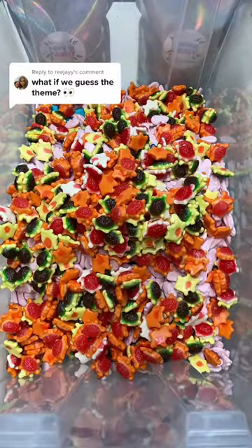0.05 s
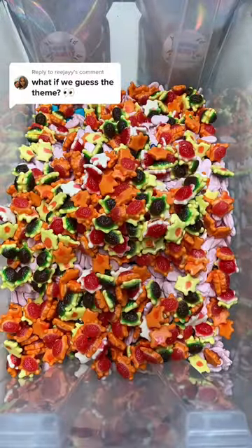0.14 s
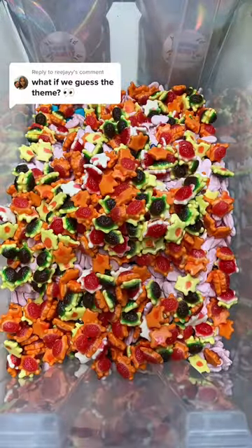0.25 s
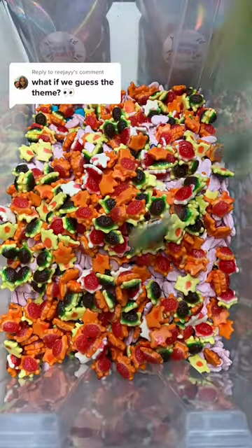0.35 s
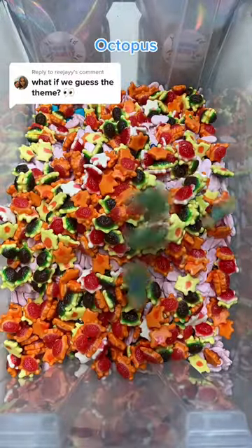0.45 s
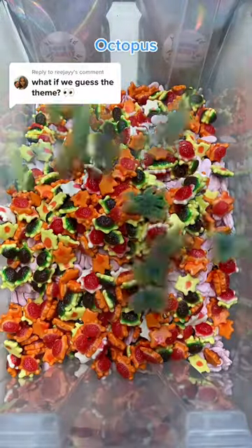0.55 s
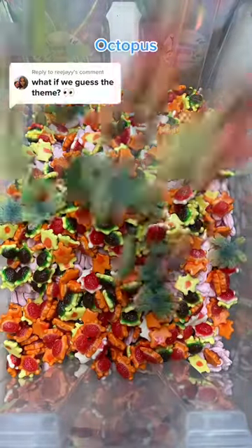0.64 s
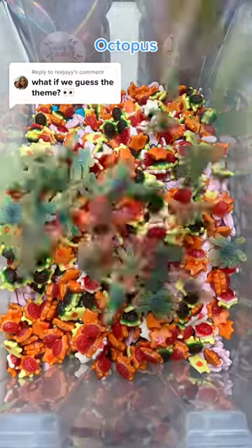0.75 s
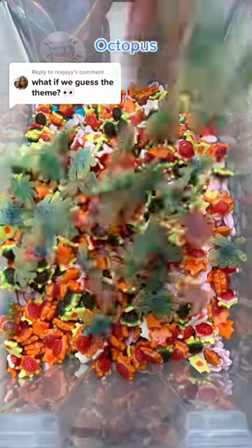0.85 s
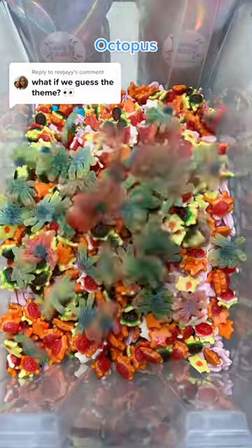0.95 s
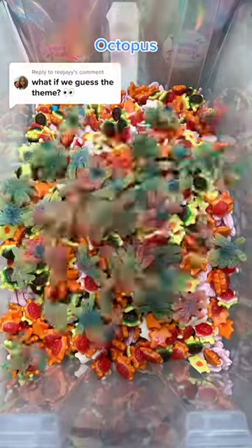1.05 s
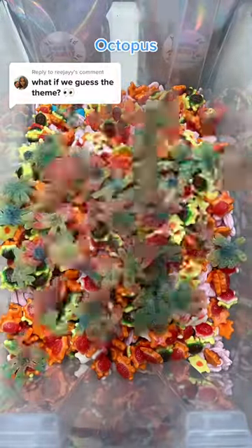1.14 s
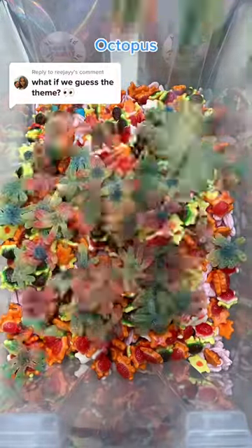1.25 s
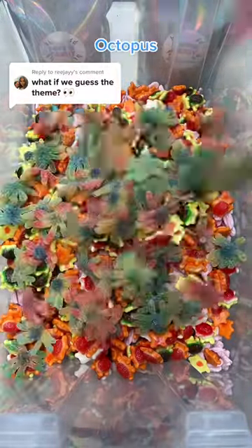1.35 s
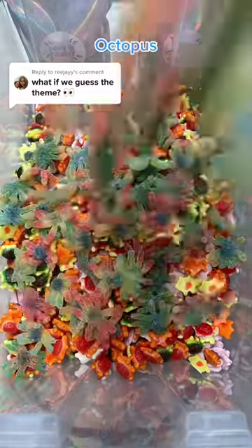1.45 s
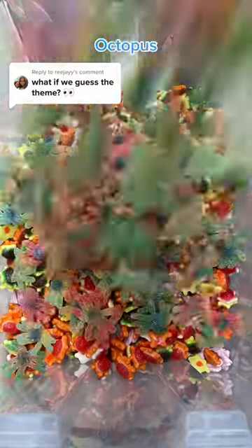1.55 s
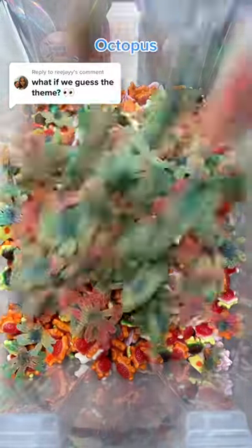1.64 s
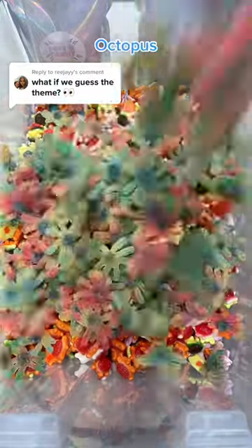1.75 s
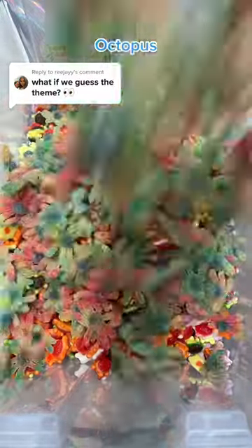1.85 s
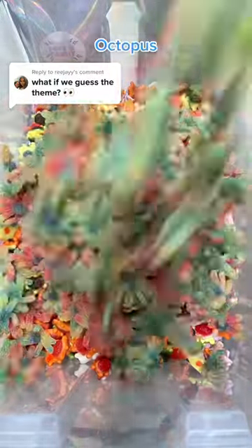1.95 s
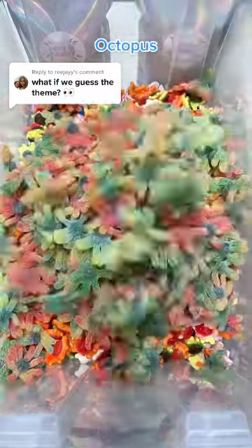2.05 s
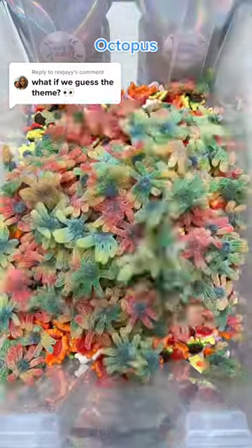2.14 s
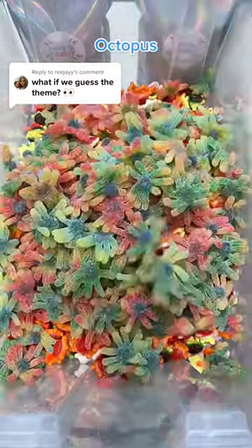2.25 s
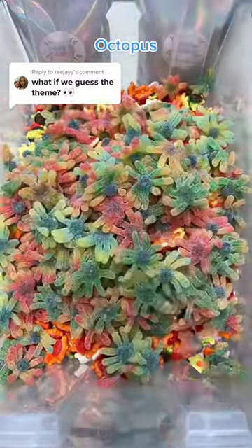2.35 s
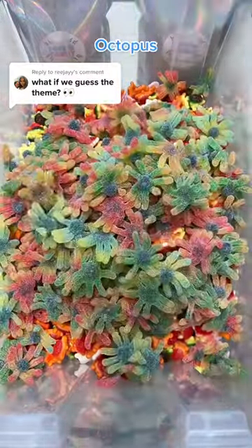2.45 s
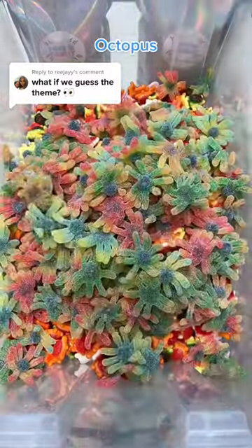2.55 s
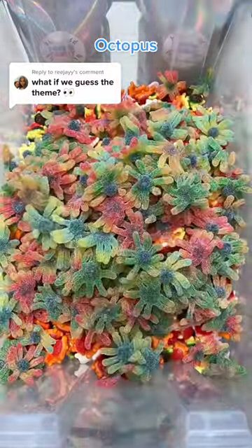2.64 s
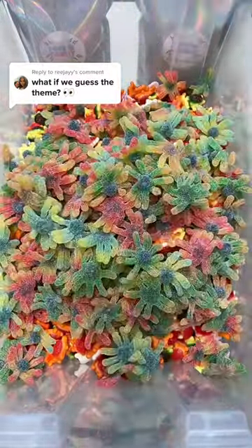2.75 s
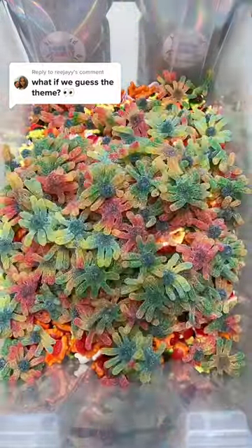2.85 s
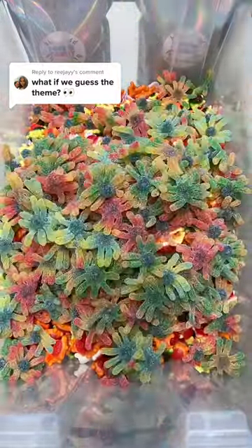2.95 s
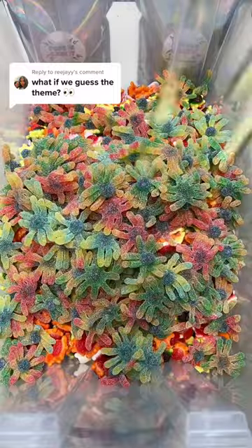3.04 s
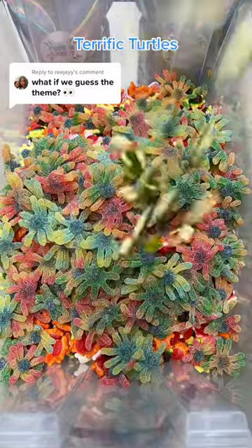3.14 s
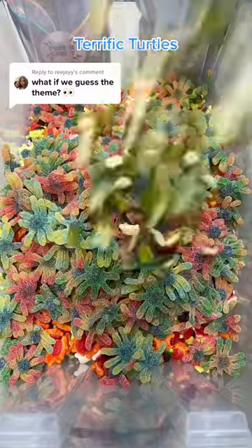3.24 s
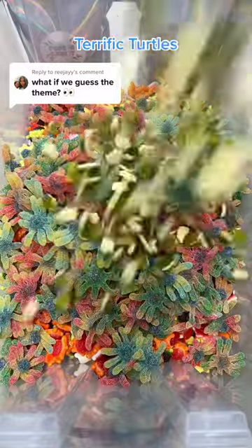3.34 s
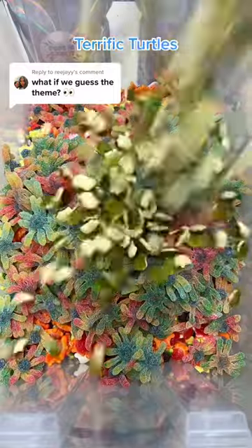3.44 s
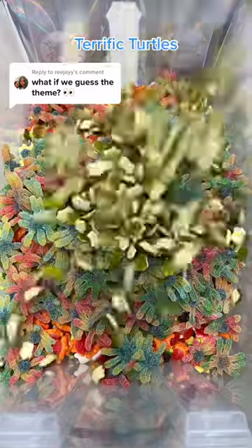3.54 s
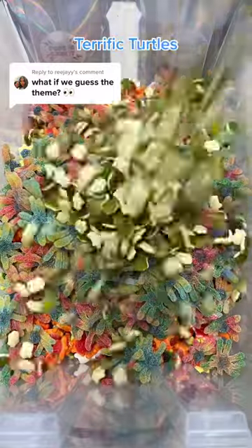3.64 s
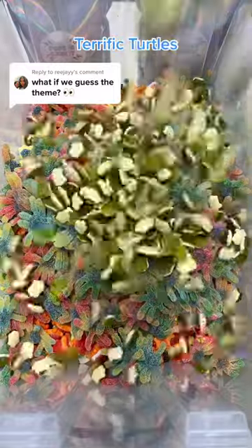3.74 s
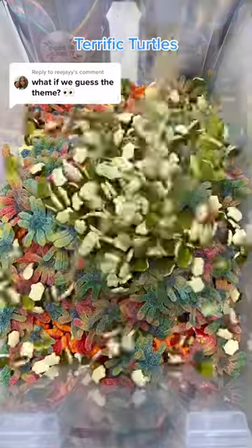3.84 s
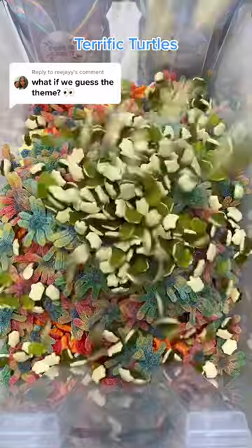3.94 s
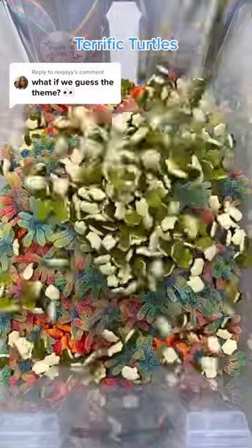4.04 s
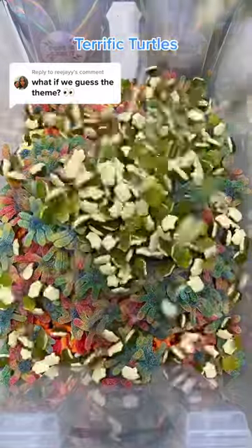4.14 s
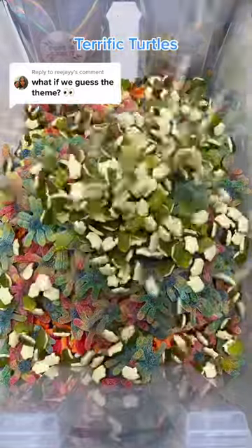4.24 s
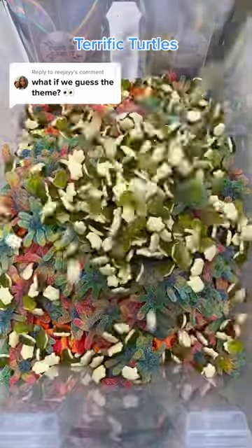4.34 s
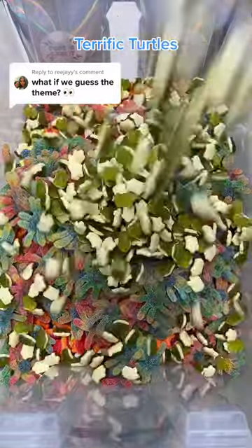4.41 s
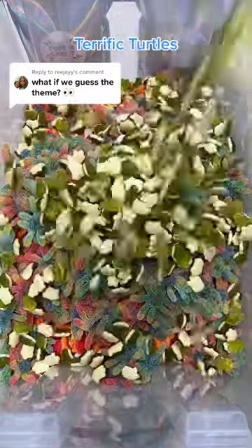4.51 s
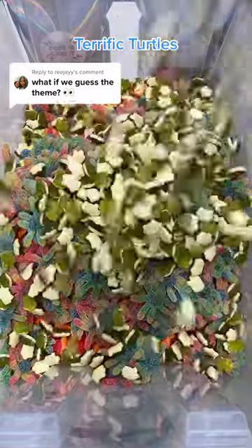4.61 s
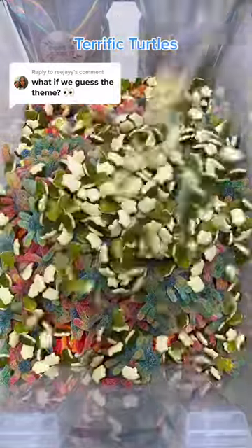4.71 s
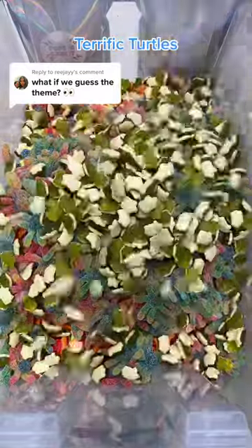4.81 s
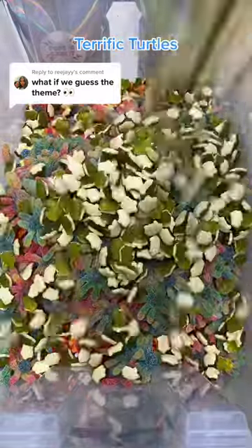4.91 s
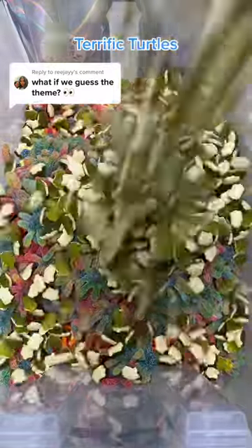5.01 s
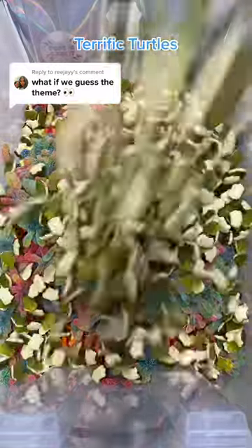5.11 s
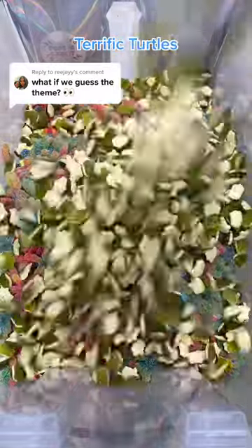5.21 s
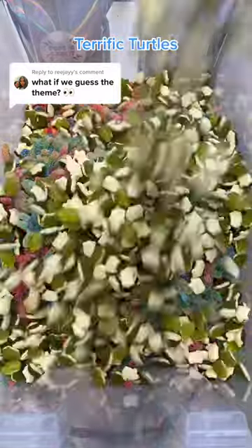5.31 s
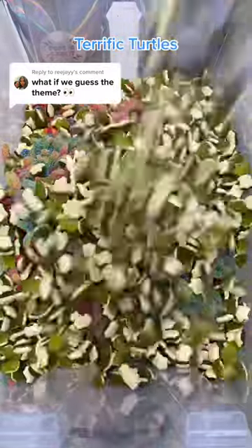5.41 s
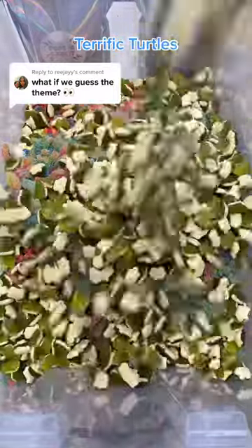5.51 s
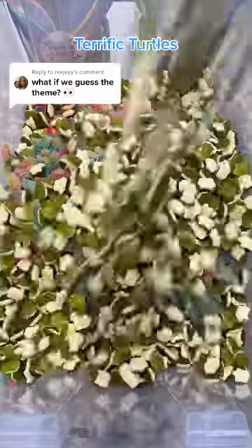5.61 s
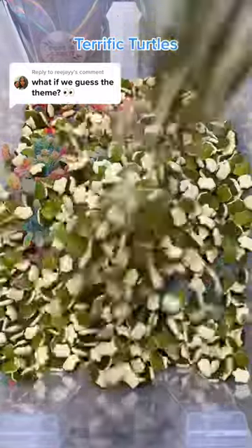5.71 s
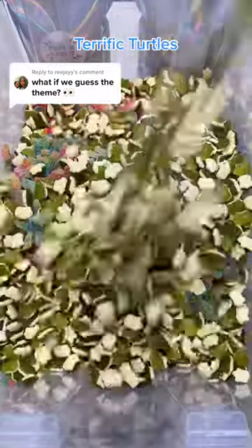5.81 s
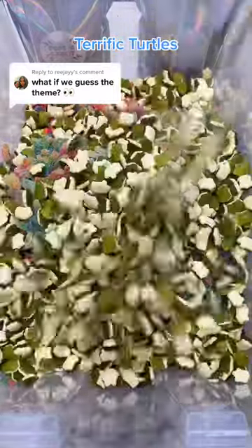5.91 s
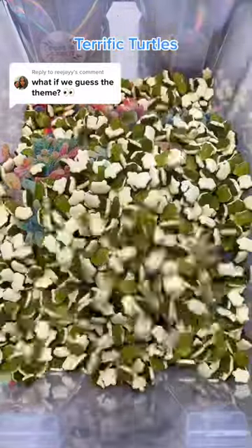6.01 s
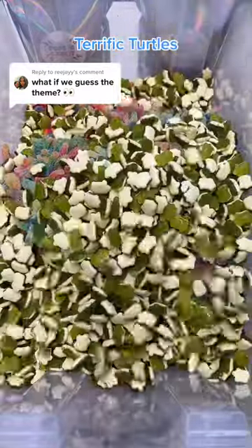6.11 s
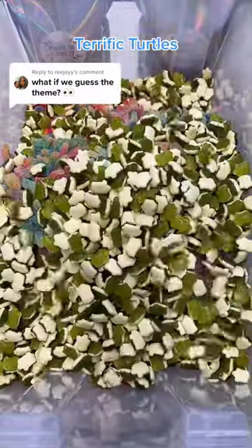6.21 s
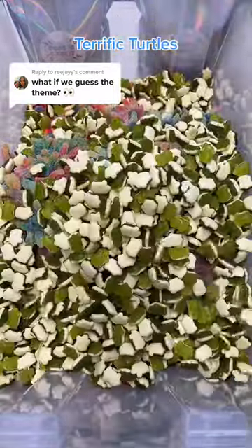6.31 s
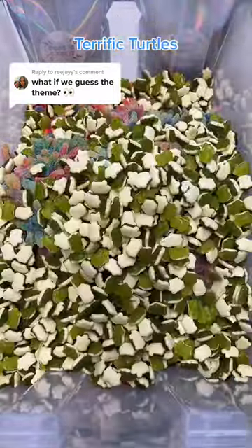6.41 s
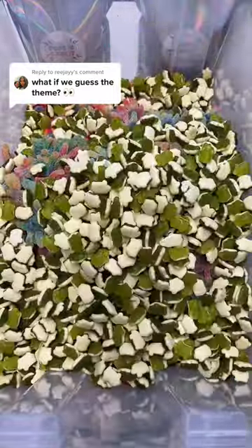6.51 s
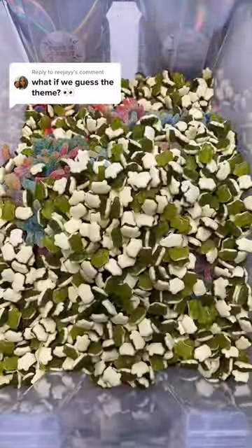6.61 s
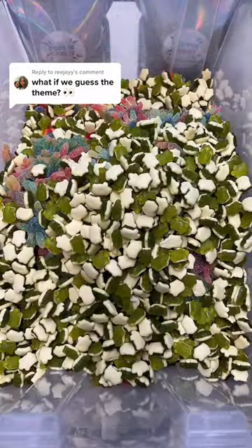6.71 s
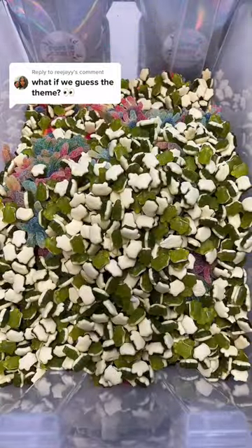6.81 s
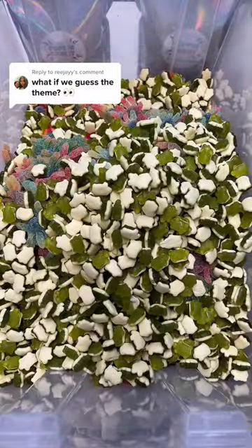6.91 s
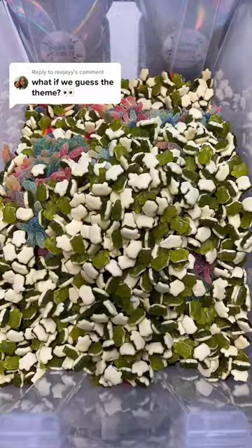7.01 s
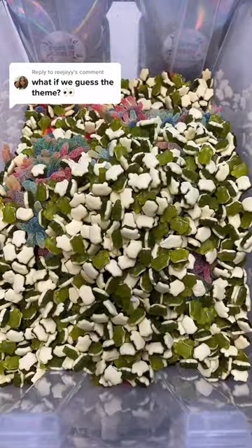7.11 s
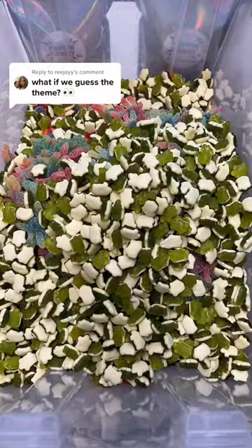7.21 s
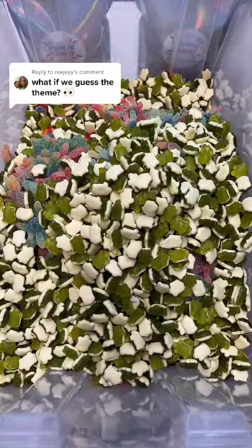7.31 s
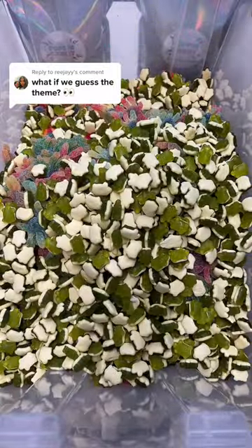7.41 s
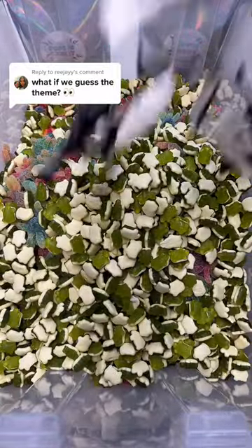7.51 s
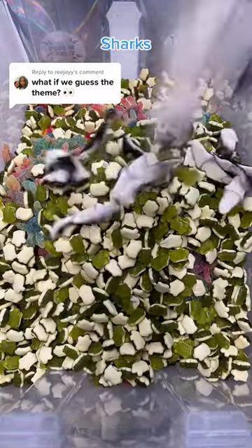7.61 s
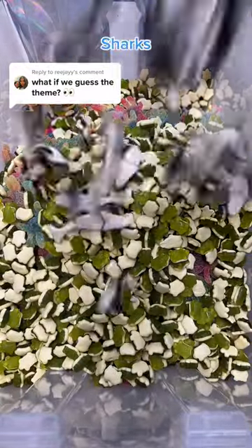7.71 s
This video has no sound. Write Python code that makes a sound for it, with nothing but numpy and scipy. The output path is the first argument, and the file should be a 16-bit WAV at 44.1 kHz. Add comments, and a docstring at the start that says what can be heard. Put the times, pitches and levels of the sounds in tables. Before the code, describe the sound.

Candies are poured in batches into a plastic bin, heard close and dry. The first is soft, heavy and bassy, rocking the bin, growing to a brief rush and ending in a hard double click. The second is lighter, faster and longer, a thick pattering clatter that swells and thins out. Quiet room air and low hum fill the pauses; at the end come soft scrapes and the first faint landings of another batch.

```python
"""Candies poured into a plastic bin

Three batches of candies fall on a heap, each clump a normalized blow split into thud, knock and clack.
Bending-wave dispersion delays the bass of a blow and leaves a short falling thud; decaying sines ring the bin.
Random ticks, filtered, make the rustle of sliding, the patter of settling, clicks and scrapes; cracks hit the wall.
A band of noise hums low under quiet room air, both falling abruptly and swelling back.
"""
import sys
import numpy as np
from scipy import signal
from scipy.fft import rfft, irfft
from scipy.io import wavfile
from scipy.ndimage import uniform_filter1d

SR = 44100
rng = np.random.default_rng(int(sys.argv[2]) if len(sys.argv) > 2 else 0)


def waveform_to_disk(signal):
    """Save audio, clipped to [-1, 1], as 16-bit WAV at the path in sys.argv[1]."""
    frames = np.transpose(np.atleast_2d(signal))
    scaled = np.clip(frames, -1, 1) * 32767
    samples = np.round(scaled).astype(np.int16)
    wavfile.write(sys.argv[1], SR, samples)


N = 342216
TIME = np.arange(N) / SR
LEAD = 256  # silent samples ahead of a blow, room for filtering before its front

# background from each start, and the hum it swells to: start_s, hum_level_db
BACKGROUND_STRETCHES = [(0.0, -58), (2.816, -49), (6.703, -59)]
# spectrum of the room air: frequency_hz, relative_level_db_per_hz
AIR_SPECTRUM = [(15, -32), (25, -7.5), (59, 6), (127, -7.5), (166, -3), (270, -13.5), (326, -10),
                (1160, -18.5), (7510, -42), (16000, -59)]
# decay of the room: frequency_hz, t60_s
ROOM_DECAY = [(100, 0.095), (300, 0.26), (800, 0.23), (2000, 0.23), (5000, 0.37), (14000, 0.031)]
# brief scrapes as a container is handled: start_s, level_db, fade_length_s
SCRAPE_EVENTS = [(0.259, -59, 0.048), (0.399, -49.5, 0.033), (2.516, -46, 0.049), (2.953, -48, 0.058),
                 (3.174, -46, 0.015), (7.153, -70, 0.025), (7.345, -58, 0.019), (7.57, -49.5, 0.043),
                 (7.631, -52, 0.011)]
# spectrum of a scrape: frequency_hz, relative_level_db_per_hz
SCRAPE_SPECTRUM = [(200, 8), (900, 6), (3000, 1.5), (6000, -7), (9000, -22.5), (15000, -25)]
# candies swell as a container tips; two pours die away, the last is still growing at the end
# levels before each layer's offset: time_s, rustle_level_db, treble_level_db, patter_level_db
FIRST_BATCH = [(0.0, -71, -91, -82), (0.54, -56.5, -73, -52.5), (0.68, -54, -62, -45.5),
               (1.05, -48, -62, -52), (1.42, -39, -54.5, -44.5), (1.66, -35.5, -50.5, -31.5),
               (1.86, -48, -56, -42.5), (2.06, -42.5, -51, -53), (2.16, -67, -73.5, -55),
               (2.5, -66, -98, -46.5)]
SECOND_BATCH = [(2.86, -64.5, -97, -64.5), (3.21, -57, -68, -58.5), (3.52, -49.5, -61, -32.5),
                (4.32, -48, -64, -43.5), (4.98, -43, -61.5, -44.5), (5.12, -41, -55, -34.5),
                (5.62, -42.5, -57.5, -32.5), (6.02, -48, -57.5, -40), (6.19, -62.5, -79, -50),
                (6.5, -77, -99, -56)]
THIRD_BATCH = [(6.85, -92, -104, -81), (7.45, -75, -97.5, -67.5), (7.62, -78, -86, -57),
               (7.76, -63, -69, -59)]
# spectrum of settling candies: frequency_hz, relative_level_db_per_hz
PATTER_SPECTRUM = [(20, -63.5), (50, -25), (100, -3.5), (170, 3.5), (280, 0.5), (450, -6.5), (900, -10.5),
                   (1600, -25), (4000, -49.5)]
# spectrum of sliding candies: frequency_hz, relative_level_db_per_hz
RUSTLE_SPECTRUM = [(150, -11), (400, -5.5), (800, -2), (1300, 1), (2400, 2), (3200, -1), (5000, -7),
                   (6300, -11.5), (7200, -19), (10000, -27.5), (15000, -21.5)]
# spectrum of a hard crack or click: frequency_hz, relative_level_db_per_hz
CRACK_SPECTRUM = [(60, -35.5), (250, 0.5), (600, 8), (1400, -1), (2200, 2), (3100, -3.5), (4500, -10.5),
                  (6300, -16.5), (8000, -31.5), (14000, -35.5)]
# hard knocks straight on the bin wall: start_s, crack_level_db, wall_ring_level_db
WALL_KNOCKS = [(0.026, -43, -47.5), (2.3812, -17.6, -19), (2.3936, -22, -24), (2.852, -35.5, -63),
               (2.9027, -36.5, -64), (5.5138, -18, -19)]
# modes of the wall: frequency_hz, relative_level_db, t60_s
WALL_MODES = [(226.3, -6.5, 0.12), (280, -10.5, 0.19), (360, -14.5, 0.14), (517, -3, 0.043), (605, 4, 0.03),
              (793, -12.5, 0.085), (1015, -11.5, 0.061), (1254, -16, 0.082), (1404, -15, 0.04),
              (2090, -24, 0.054), (3144, -14, 0.073)]
# clumps that stand out of the stream, levels of the main blow before the room:
# start_s, clack_level_db, knock_level_db, thud_level_db, landing_place_pitch_hz
CLUMP_LANDINGS = [(0.604, -23.5, -38.5, -29.5, 176), (0.6984, -32.5, -42, -39, 201),
                  (0.7116, -29, -40, -27.5, 203), (0.7463, -33.5, -38.5, -30, 174),
                  (0.8031, -31, -37.5, -33, 185), (0.833, -35, -38, -25, 170),
                  (0.951, -22.5, -34, -32.5, 231), (1.035, -21.5, -33, -35, 366),
                  (1.4304, -22.5, -29.5, -30.5, 374), (1.4986, -11.5, -37.5, -25, 150),
                  (1.5063, -28, -26.5, -18, 202), (1.5845, -28, -31.5, -32.5, 225),
                  (1.6195, -24, -32, -39, 217), (1.6772, -23.5, -31.5, -34, 278),
                  (1.7113, -22, -31, -25, 237), (1.7343, -17.5, -30.5, -27, 167),
                  (1.7617, -26, -30, -35.5, 270), (1.823, -19, -30.5, -25, 244),
                  (1.875, -30, -44, -31.5, 245), (1.999, -50, -42, -32.5, 394),
                  (2.0704, -21, -24.5, -24, 205), (2.1804, -32.5, -38.5, -38, 270),
                  (2.2332, -40, -49, -55, 229), (3.303, -35.5, -39.5, -31.5, 245),
                  (3.3881, -34, -38.5, -31.5, 142), (3.5018, -36, -35, -27.5, 253),
                  (3.601, -27, -38, -27, 214), (3.658, -21, -29, -23.5, 224),
                  (3.687, -23, -26.5, -17.5, 245), (3.7476, -21.5, -31.5, -25, 245),
                  (3.7798, -23, -23.5, -19, 315), (3.8414, -37, -35, -29.5, 180),
                  (3.869, -23.5, -29.5, -22.5, 191), (3.924, -25.5, -35, -27, 213),
                  (3.9413, -56, -44, -25.5, 232), (4.0111, -32, -43, -42, 261),
                  (4.0354, -35, -32.5, -25, 261), (4.0702, -16.5, -29, -21.5, 260),
                  (4.087, -19, -24.5, -19.5, 226), (4.1494, -39, -39, -31, 196),
                  (4.2373, -24.5, -30.5, -27.5, 207), (4.2805, -27.5, -47, -42.5, 385),
                  (4.2961, -30.5, -48, -46.5, 197), (4.3526, -30, -35.5, -25, 170),
                  (4.3908, -30.5, -32.5, -20.5, 156), (4.4543, -28.5, -34, -26.5, 204),
                  (4.5136, -25.5, -40, -48, 400), (4.5353, -19.5, -30.5, -21.5, 279),
                  (4.5951, -32, -33.5, -23, 254), (4.6392, -20.5, -25.5, -21.5, 291),
                  (4.6842, -13.5, -21, -22.5, 234), (4.7409, -24, -30, -19, 242),
                  (4.7834, -17.5, -26, -20, 201), (4.847, -17.5, -27.5, -21, 275),
                  (4.9227, -24.5, -42, -31, 213), (4.965, -29, -38.5, -28.5, 207),
                  (5.0426, -20, -25, -20, 252), (5.0679, -17, -25, -22.5, 130),
                  (5.1662, -18, -25, -19, 343), (5.1843, -31, -40.5, -17.5, 245),
                  (5.209, -24, -24.5, -20, 170), (5.2319, -27, -30.5, -22.5, 288),
                  (5.2535, -23.5, -31, -20.5, 209), (5.297, -28.5, -32.5, -24, 267),
                  (5.3237, -19.5, -24, -19, 209), (5.3497, -16, -18.5, -20.5, 348),
                  (5.3808, -14, -23.5, -20.5, 290), (5.5074, -35, -20.5, -24.5, 190),
                  (5.552, -17.5, -35.5, -33, 363), (5.5802, -17, -23.5, -20.5, 280),
                  (5.6009, -23, -36, -28, 198), (5.6209, -22.5, -25, -18.5, 259),
                  (5.689, -32, -31, -28, 208), (5.7185, -34, -37, -21.5, 282),
                  (5.812, -41, -55, -19.5, 194), (5.9309, -36, -37.5, -30, 330),
                  (6.0019, -26, -33, -27, 225), (6.0511, -30, -29, -30, 365),
                  (6.1247, -22, -27.5, -26, 360), (6.1716, -36, -32, -20.5, 180),
                  (6.2646, -31, -39, -33, 278), (6.3523, -41.5, -43.5, -42, 158),
                  (7.5296, -45, -51, -36, 231), (7.578, -54, -63, -39, 216), (7.6808, -52, -57.5, -52, 300),
                  (7.743, -40.5, -52, -46.5, 85)]
# modes of the bin, raised by up to 2 % at each blow: lowest_frequency_hz, relative_level_db, t60_s
BIN_MODES = [(159.2, -2.5, 0.2), (205, -5, 0.098), (245, -3.5, .16), (279.5, -6.5, 0.089),
             (358.5, -3.5, 0.11), (442.5, -15.5, 0.052), (594.5, -6.5, 0.11), (743, -8.5, 0.084),
             (1150.5, -6.5, 0.077), (1730, -23.5, 0.093)]
# spectrum of the contact in a blow: frequency_hz, relative_level_db_per_hz
BLOW_SPECTRUM = [(20, -63.5), (45, -42), (80, -2), (140, -2.5), (240, 0.5), (340, -2), (480, -4.5),
                 (900, -10), (1400, -17), (3000, -29), (4500, -35.5), (6300, -42), (8000, -52),
                 (14000, -61)]

HUM_HZ, ROOM_AIR_DB = 56, -52.5
DROP_DB, SWELL_S = -12.5, 1.76  # depth of a background drop and time to swell back
# light clumps jostle on while heavy ones stop dead: ringing dB gained per dB that the thud is under RING_EVEN_DB
RING_SLOPE, RING_EVEN_DB = .33, -27
LARGE_RING_DB = -2.5  # large soft candies damp the ringing
SMALL_FROM_S, SMALL_UNTIL_S = 3, 7  # small candies fall between these times
# large candies rock the whole bin, small ones hardly do; levels are against the thud
SWAY_CENTRE_HZ, SWAY_T60_S, SWAY_RISE_S = 56, 0.33, 0.012
SWAY_LARGE_DB, SWAY_SMALL_DB = -6, -23
# one weaker candy ahead of a clump and one behind: mean times, and levels against the clump
AHEAD_S, AHEAD_DB, BEHIND_S, BEHIND_DB = .007, -16, .018, -11


def amp(db):
    """Level to amplitude: 20 dB is a factor of ten."""
    return 10 ** (np.asarray(db) / 20)


def unit(x):
    """Power normalization: scales to rms 1."""
    return x / np.sqrt(np.mean(x ** 2) + 1e-20)


def loudest(x, size):
    """Short-time power: scales x so that its loudest stretch of size samples has rms 1."""
    return x / np.sqrt(uniform_filter1d(x ** 2, size).max())


def decay(t, t60):
    """Exponential damping: amplitude falls 60 dB in t60 seconds."""
    return np.exp(-np.log(1000) * t / t60)


def read(points, hz):
    """Logarithmic frequency axis: interpolates a table evenly per octave."""
    table_hz, value = np.transpose(points)
    return np.interp(np.log(hz + 1), np.log(table_hz), value)


def bins(x):
    """Discrete spectrum: the frequencies in Hz of the transform of x."""
    return np.fft.rfftfreq(len(x), 1 / SR)


def colour(x, points):
    """Minimum phase: a causal filter with the given spectrum keeps the sharp front of a click."""
    log_gain = np.log(amp(read(points, abs(np.fft.fftfreq(4096, 1 / SR)))))
    taps = np.fft.ifft(np.exp(np.conj(signal.hilbert(log_gain)))).real
    return signal.oaconvolve(x, taps[:len(taps) // 2])[:len(x)]


def split(x, hz):
    """Complementary crossover: the parts below and above hz sum to x."""
    low = irfft(rfft(x) / (1 + (bins(x) / hz) ** 8), len(x))
    return low, x - low


def favour(x, hz, boost_db=9.5, octaves=0.25):
    """Resonance: a bell-shaped lift of the band around hz."""
    distance = np.log2((bins(x) + 1) / hz) / octaves
    gain = amp(boost_db * np.exp(-.5 * distance ** 2))
    return irfft(rfft(x) * gain, len(x))


def add(mix, s, sound):
    """Superposition: adds a sound to the mix at time s."""
    part = mix[max(round(s * SR), 0):][:len(sound)]
    part += sound[:len(part)]


def burst(t, t60):
    """Damped noise: an exponential decay of energy 1."""
    x = rng.standard_normal(len(t)) * decay(t, t60)
    return x / np.linalg.norm(x)


def bend(x, lag, front_hz=1500):
    """Bending waves travel at a speed that grows as the root of frequency: 200 Hz lags front_hz by lag s."""
    slowness = np.maximum(np.clip(bins(x), 150, None) ** -.5 - front_hz ** -.5, 0)
    delay = lag * slowness / (200 ** -.5 - front_hz ** -.5)
    # group delay summed over frequency gives the phase
    phase = 2 * np.pi * np.cumsum(delay) * SR / len(x)
    return irfft(rfft(x) * np.exp(-1j * phase), len(x))


def ticks(per_s, spread_db):
    """Random collisions at a mean rate: exponential spread in dB, to strong if positive, to weak if negative."""
    chance = rng.uniform(-1, 1, N) * SR / per_s
    hit = abs(chance) < 1
    out = np.zeros(N)
    strength_db = spread_db * np.minimum(-np.log(abs(chance[hit])), 4)
    out[hit] = np.sign(chance[hit]) * amp(strength_db)
    return out


def surge(rate_hz, depth_db):
    """Random modulation: a gain of rms depth_db that varies mostly slower than rate_hz."""
    noise = rng.standard_normal(N)
    slow = irfft(rfft(noise) / (1 + (bins(noise) / rate_hz) ** 4), N)
    return amp(depth_db * unit(slow))


def pouring(column):
    """Flow envelope: one column of the pours in dB at every sample, -120 dB outside the batches."""
    pours = map(np.asarray, (FIRST_BATCH, SECOND_BATCH, THIRD_BATCH))
    levels = [np.interp(TIME, rows[:, 0], rows[:, column], -120, -120) for rows in pours]
    return np.max(levels, axis=0)


def large(s):
    """Size classes: whether the candies that fall at time s are large."""
    return not SMALL_FROM_S < s < SMALL_UNTIL_S


def background(width_hz=7):
    """Narrow-band noise beats as a wavering hum; broadband air joins it, both swelling from a low start."""
    noise = rng.standard_normal(N)
    hum = irfft(rfft(noise) / (1 + ((bins(noise) - HUM_HZ) / width_hz) ** 4), N)
    # evened out, so that it wavers without fading away
    hum /= np.sqrt(abs(signal.hilbert(unit(hum))) + .1)
    air = colour(rng.standard_normal(N), AIR_SPECTRUM)
    starts, hum_db = np.transpose(BACKGROUND_STRETCHES)
    now = np.searchsorted(starts[1:], TIME)
    swell = amp(DROP_DB * np.clip(1 - (TIME - starts[now]) / SWELL_S, 0, 1))
    hum_level = uniform_filter1d(swell * amp(hum_db[now]), size=256)
    return unit(hum) * hum_level + unit(air) * swell * amp(ROOM_AIR_DB)


def scrapes(rise_s=0.0072, per_s=1500, spread_db=-2.0):
    """Friction as dense ticks: plastic and candies rub with a quick rise, then a Gaussian fade."""
    level, age = np.zeros(N), np.arange(2 ** 14) / SR
    for s, db, length in SCRAPE_EVENTS:
        add(level, s, amp(db) * np.minimum(age / rise_s, 1) * np.exp(-(age / length) ** 2))
    return level * unit(colour(ticks(per_s, spread_db), SCRAPE_SPECTRUM))


def patter(per_s=300, spread_db=3, offset_db=-2.0):
    """Dispersed impacts: single candies settle on the heap, heard through the bin wall."""
    taps = bend(colour(ticks(per_s, spread_db), PATTER_SPECTRUM), lag=0.00986)
    return unit(taps) * amp(pouring(column=3) + offset_db)


def rustle(per_s=3000, spread_db=-0.5, body_offset_db=-1.27, top_offset_db=1.0):
    """Sliding friction as dense ticks: candies rub over each other in small uneven slips."""
    slips = colour(ticks(per_s, spread_db), RUSTLE_SPECTRUM)
    body, top = split(slips * surge(rate_hz=30, depth_db=1.4), 6900)
    top = top * surge(rate_hz=14, depth_db=3.3)
    body_level = amp(pouring(column=1) + body_offset_db)
    top_level = amp(pouring(column=2) + top_offset_db)
    return unit(body) * body_level + unit(top) * top_level


def clatter(per_s=70, spread_db=2.5, t60=0.01, offset_db=0.0, settle_db=-8, count=12):
    """Resonant impacts: candies click at one of count pitches, following both sliding and settling."""
    t = np.arange(2 ** 11) / SR
    out = np.zeros(N)
    for hz in np.geomspace(1000, 4500, count):
        crack = np.pad(colour(burst(t, t60), CRACK_SPECTRUM), LEAD)
        click = favour(crack, hz, boost_db=18.5, octaves=0.28)
        out += signal.oaconvolve(ticks(per_s / count, spread_db), unit(click))[:N]
    level_db = np.minimum(pouring(column=1), pouring(column=3) + settle_db)
    return unit(out) * amp(level_db + offset_db)


def knocks(crack_t60=0.03, ring_t60=0.26, ring_db=-4):
    """Modal excitation: a sharp crack sets the wall ringing at once, with no heap in between."""
    t, out = np.arange(2 ** 13) / SR, np.zeros(N)
    for s, crack_db, wall_db in WALL_KNOCKS:
        crack = colour(burst(t, crack_t60) + amp(ring_db) * burst(t, ring_t60), CRACK_SPECTRUM)
        wall = np.zeros(len(t))
        for hz, db, t60 in WALL_MODES:
            sign = rng.choice([-1, 1])
            wall += sign * amp(db) * decay(t, t60) * np.sin(2 * np.pi * hz * t)
        add(out, s, amp(crack_db) * loudest(crack, size=2) + amp(wall_db) * loudest(wall, size=220))
    return out


def sway():
    """Damped rigid-body oscillation: each landing rocks the loaded bin in a short, very low boom."""
    t, out = np.arange(SR // 2) / SR, np.zeros(N)
    shape = (1 - np.exp(-t / SWAY_RISE_S)) * decay(t, SWAY_T60_S)
    for s, _, _, thud_db, _ in CLUMP_LANDINGS:
        weight_db = SWAY_LARGE_DB if large(s) else SWAY_SMALL_DB
        hz = SWAY_CENTRE_HZ * rng.uniform(.85, 1.3)
        add(out, s, amp(thud_db + weight_db) * shape * np.sin(2 * np.pi * hz * t))
    return out


def bin_ring(t):
    """Modal superposition: every landing place weights the modes of the bin differently."""
    ring = np.zeros(len(t))
    for hz, db, t60 in BIN_MODES:
        weight = rng.normal() * amp(db)
        ring += weight * decay(t, t60) * np.sin(2 * np.pi * hz * rng.uniform(1.0, 1.02) * t)
    return ring


def landing(clack_db, knock_db, thud_db, hz, ring_db, lag=0.009634, crush_t60=0.034,
            crush_rise_s=0.00062, crush_db=6, jostle_t60=0.068, jostle_db=-5, modes_db=-5):
    """Impact on a granular heap: one push, a crunch of neighbouring candies, and the bin ringing on."""
    t = np.arange(2 ** 13 - 2 * LEAD) / SR
    push = rng.choice([-1., 1.]) * (t == 0)
    # the candies of a clump touch down one just after another
    crush = burst(t, crush_t60) * (1 - np.exp(-t / crush_rise_s))
    crush = signal.sosfilt(signal.butter(4, 800, "high", fs=SR, output="sos"), crush)
    jostle = amp(jostle_db + ring_db) * burst(t, jostle_t60)
    contact = push + amp(crush_db) * crush + jostle
    wave = unit(colour(contact, BLOW_SPECTRUM)) + amp(modes_db + ring_db) * unit(bin_ring(t))
    wave = bend(favour(np.pad(wave, LEAD), hz), lag * rng.uniform(0.8, 1.078))
    # the heap cushions each blow differently in the bass, middle and treble
    thud, upper = split(wave, 458)
    knock, clack = split(upper, 1590)
    thud = amp(thud_db) * loudest(thud, size=700)
    knock = amp(knock_db) * loudest(knock, size=220)
    clack = amp(clack_db) * loudest(clack, size=2)
    return thud + knock + clack


def landings():
    """Staggered impacts: every clump strikes the heap between a forerunner and a straggler."""
    out = np.zeros(N)
    for s, clack_db, knock_db, thud_db, hz in CLUMP_LANDINGS:
        ahead, behind, ahead_tune, behind_tune = rng.uniform(.5, 1.5, 4)
        ring_db = RING_SLOPE * (RING_EVEN_DB - thud_db) + LARGE_RING_DB * large(s)
        blows = [(0, 0, hz),
                 (-AHEAD_S * ahead, AHEAD_DB, hz * ahead_tune),
                 (BEHIND_S * behind, BEHIND_DB, hz * behind_tune)]
        for delay, db, pitch in blows:
            blow = landing(clack_db + db, knock_db + db, thud_db + db, pitch, ring_db)
            add(out, s + delay - LEAD / SR, blow)
    return out


def room(x, wet_db, rise_s=0.0058):
    """Reverberation: adds a diffuse tail in which each band dies at its own speed."""
    hz, t, z = signal.stft(rng.standard_normal(SR // 2), SR, nperseg=256)
    tail = signal.istft(z * decay(t, read(ROOM_DECAY, hz)[:, None]), SR)[1]
    tail *= np.minimum(np.arange(len(tail)) / SR / rise_s, 1) ** 2
    return x + amp(wet_db) * signal.oaconvolve(x, tail / np.linalg.norm(tail))[:N]


def scene():
    """Superposition: blows and stream with room tails, over background and sway without."""
    stream = room(rustle() + clatter() + patter() + scrapes(), wet_db=-14.5)
    blows = room(landings() + knocks(), wet_db=-13.0)
    return (background() + stream + sway() + blows)[None]


def record(dry, low_cut_hz=34, edge_hz=15900):
    """Band limiting: the microphone's bass roll-off and a steep treble limit."""
    heard = signal.sosfilt(signal.butter(2, low_cut_hz, "high", fs=SR, output="sos"), dry)
    treble_limit = signal.firwin(511, edge_hz, window=("kaiser", 9), fs=SR)
    return signal.oaconvolve(heard, treble_limit[None], "same")


dry = scene()
out = record(dry)
waveform_to_disk(out)
```